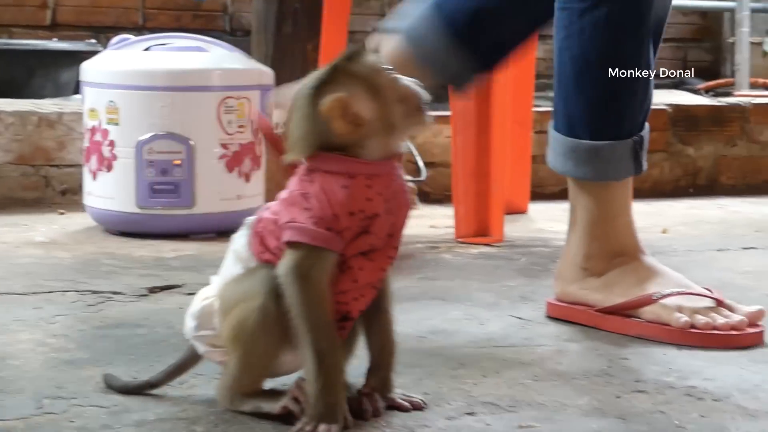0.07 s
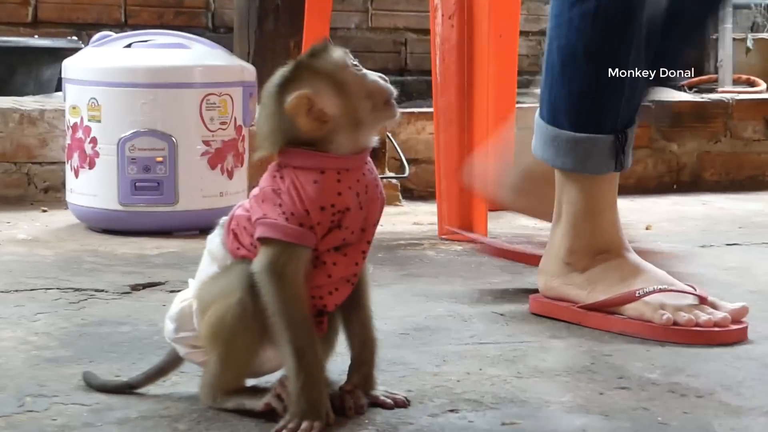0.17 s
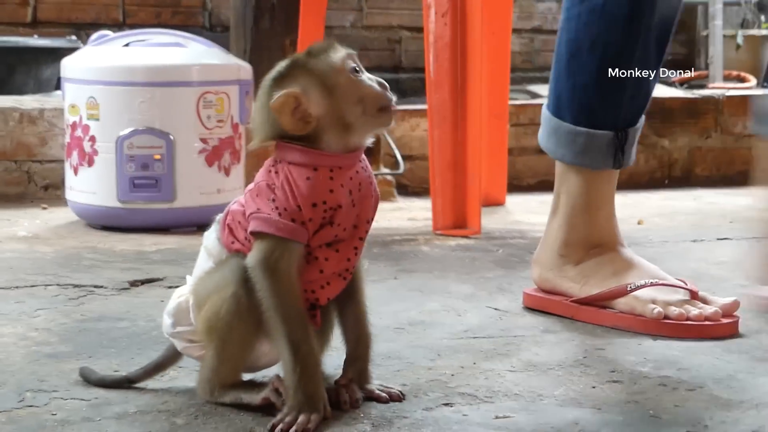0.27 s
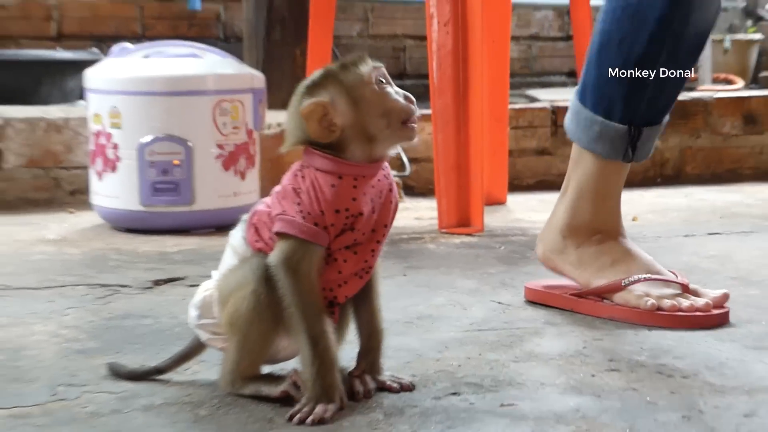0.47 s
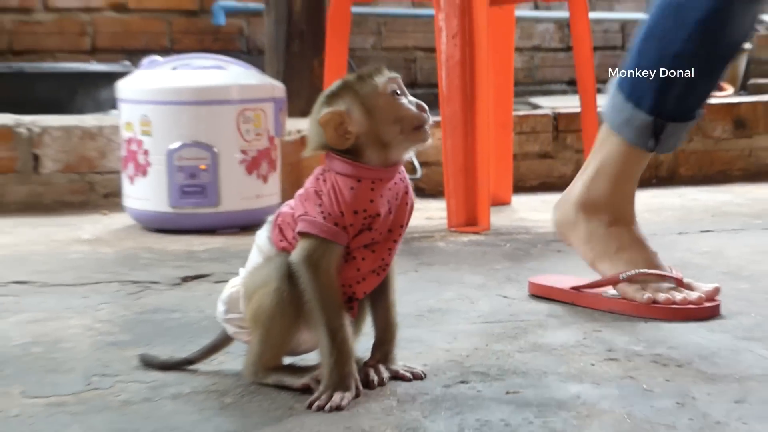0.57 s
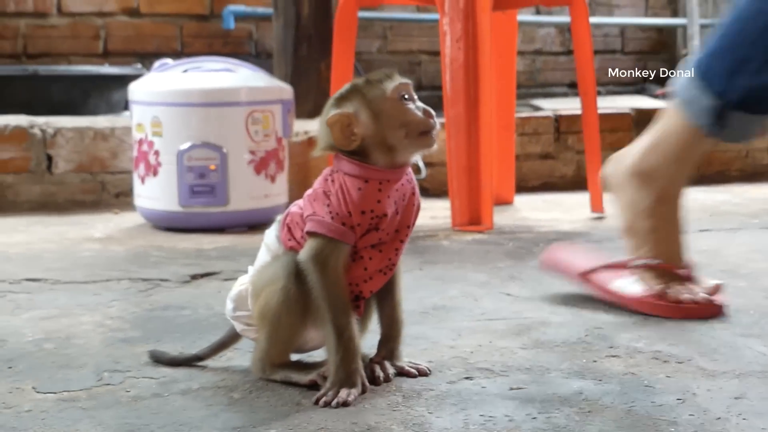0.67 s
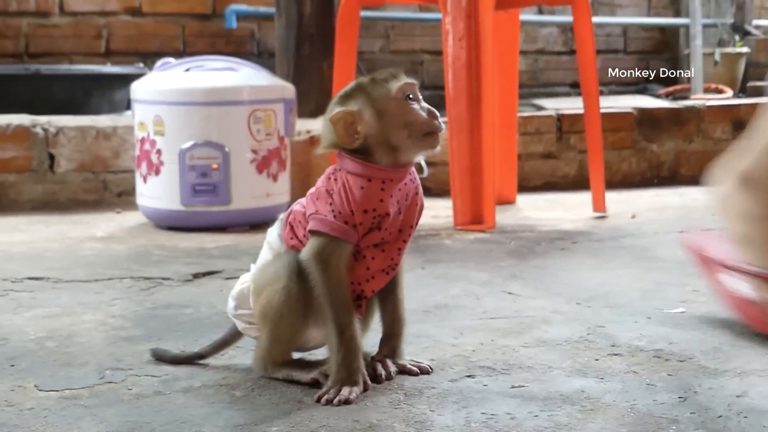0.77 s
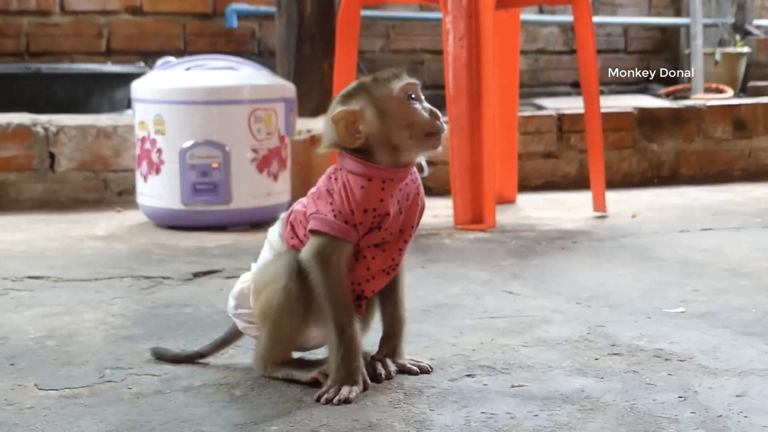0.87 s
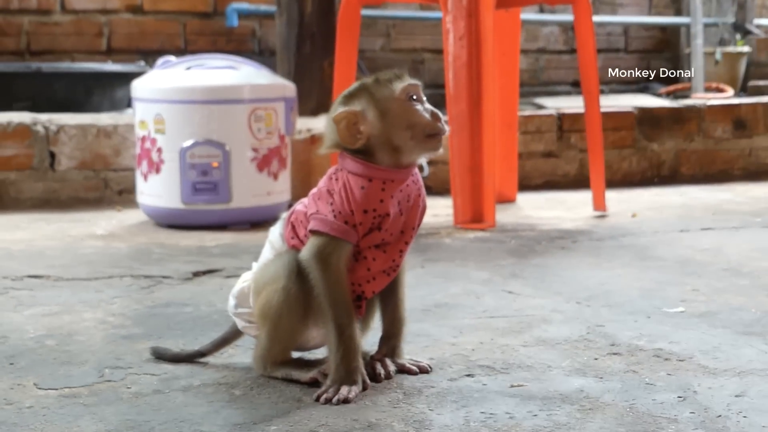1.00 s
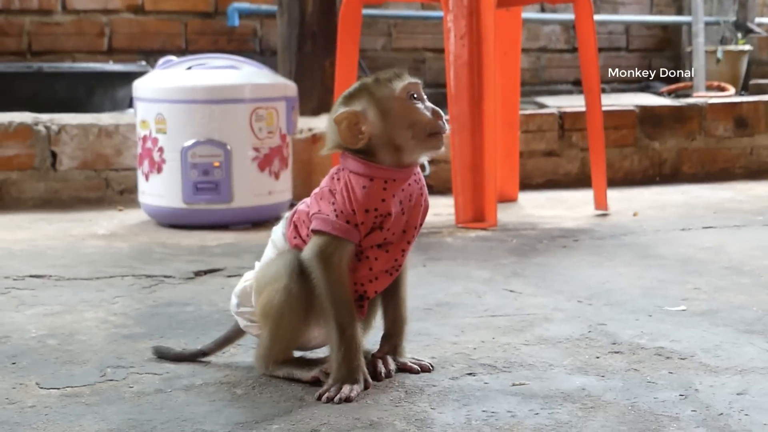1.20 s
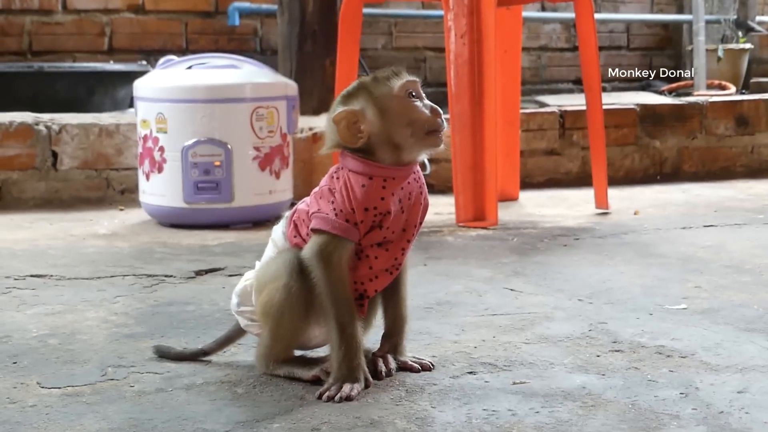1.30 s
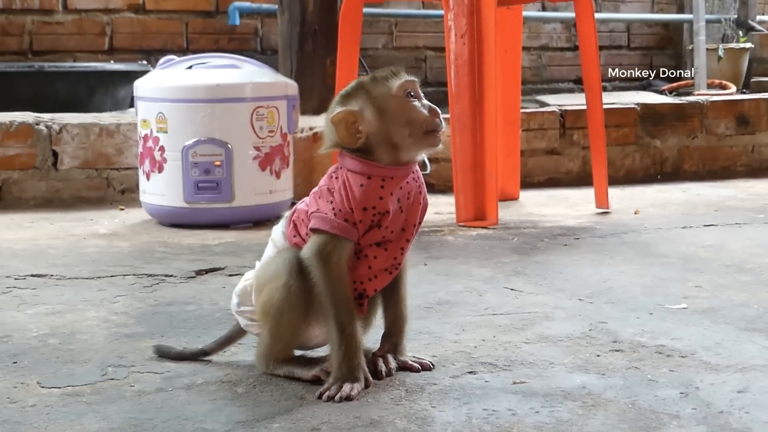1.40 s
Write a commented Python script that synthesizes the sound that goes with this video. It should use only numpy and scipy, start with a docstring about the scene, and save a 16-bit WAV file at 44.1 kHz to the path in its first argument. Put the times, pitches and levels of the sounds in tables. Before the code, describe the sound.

A flip-flop scuffs, squeaks and slaps against a heel on a gritty concrete floor.

```python
"""A faint rustle, then a flip-flop scuffs and squeaks close by on a gritty concrete floor.
The rubber sole hisses as it drags and squeaks as it sticks and slips. Then it peels off the floor
and slaps against the heel, the main sound. Hollow knocks of the sole and small ticks of grit lie
around these. The hard-walled room echoes briefly, over a low, quiet noise with a faint hum."""
import sys
import numpy as np
from scipy import signal
from scipy.fft import rfft, irfft, next_fast_len
from scipy.io import wavfile
from scipy.ndimage import map_coordinates

SR = 44100
rng = np.random.default_rng(int(sys.argv[2]) if len(sys.argv) > 2 else 0)


def persist_wave(psi):
    """Save psi, clipped to +-1, as 16-bit WAV."""
    counts = np.round(np.clip(psi, -1, 1) * 32767).astype(np.int16)
    wavfile.write(sys.argv[1], SR, np.atleast_2d(counts).T)


N = 63945


def amp(db):
    """Turn decibels into a gain."""
    return 10 ** (np.asarray(db) / 20)


def unit(x):
    """Scale x to an average (rms) level of 1."""
    return x / np.sqrt(np.mean(x ** 2) + 1e-20)


def clock():
    """The time of every sample, in seconds."""
    return np.arange(N) / SR


def along(points, hz):
    """Read a (freq_hz, value) table at hz, on a log frequency scale."""
    freqs, values = np.transpose(points)
    return np.interp(np.log(hz + 1), np.log(freqs + 1), values)


def wobble(rate):
    """A smooth curve through rate random points a second."""
    return map_coordinates(rng.standard_normal(N // 8), [clock() * rate], mode="wrap")


def filtered(x, response):
    """Scale each frequency in x by response(hz)."""
    size = next_fast_len(N + SR // 2)
    return irfft(rfft(x, size) * response(np.fft.rfftfreq(size, 1 / SR)), size)[..., :N]


def pan(db):
    """Left and right gains; negative db leans right."""
    return amp(np.array([[1], [-1]]) * db / 2)


def stereo(pair, alike):
    """Mix two unrelated signals to a left-right likeness (0 unrelated, 1 the same)."""
    turn = lambda hz: np.arccos(np.clip(along(alike, hz), -1, 1)) / 2
    mid, side = filtered(pair, lambda hz: np.array([np.cos(turn(hz)), np.sin(turn(hz))]))
    return np.array([mid + side, mid - side])


# How alike left and right are for nearby sounds: freq_hz, likeness
CLOSE_LIKENESS = [(200, 0.81), (6000, 0.91), (9000, 0.8), (14000, 0.25)]
def noise(colour, alike=CLOSE_LIKENESS, grain=1):
    """Stereo noise at level 1; its colour says which frequencies are strong or weak."""
    hiss = stereo(grain * rng.standard_normal((2, N)), alike)
    return unit(filtered(hiss, lambda hz: amp(along(colour, hz))))


CONTACT_RISE_S = 0.00031
def strike(start_s, db, fade_s, rise_s=CONTACT_RISE_S):
    """The loudness of one hit: a quick rise and a fall of 60 dB in fade_s."""
    age = np.maximum(clock() - start_s, 0)
    fall = amp(db - 60 * age / fade_s)
    return fall * (1 - np.exp(-age / rise_s))


def swell(middle_s, half_s, db):
    """Loudness that rises and falls in a bell shape."""
    return amp(db) * np.exp(-.5 * ((clock() - middle_s) / half_s) ** 2)


def contacts(rows, colour):
    """Hits that do not ring: one noise burst per row of start_s, level_db, fade_s."""
    return np.sqrt(sum(strike(*row) ** 2 for row in rows)) * noise(colour)


def ring(start_s, db, hz, fade_s, rise_s=CONTACT_RISE_S):
    """One slightly unsteady tone that dies away."""
    loudness = np.sqrt(2) * strike(start_s, db, fade_s, rise_s)
    return loudness * np.sin(2 * np.pi * hz * (clock() - start_s) + .5 * wobble(250))


def rub(stroke, colour, grains_per_s=4000, spread_db=2.5, grain_share=0.42):
    """One surface drags over another: dense grains on a fine hiss."""
    catches = rng.random(N) < grains_per_s / SR
    grains = catches * amp(spread_db * np.minimum(rng.exponential(size=N), 3))
    texture = np.sqrt(1 - grain_share + grain_share * unit(grains) ** 2)
    level_db = np.interp(clock(), *np.transpose(stroke), left=-120, right=-120)
    return amp(level_db) * noise(colour, grain=texture)


# Colour of the room's low noise: freq_hz, gain_db
AIR_COLOUR = [(15, -61), (25, -60), (81, -2.5), (207, -1), (515, -5.5), (691, -5.5), (1150, -8),
              (1540, -10.5), (1860, -13.5), (3930, -21), (9520, -27.5), (15000, -32)]
# How alike it is left and right: freq_hz, likeness
AIR_LIKENESS = [(50, 0), (200, 0.41), (700, 0.41), (5000, 0.73), (12000, 0.5)]
# Tones of the hum: pitch_hz, level_db
HUM_TONES = [(199, -60), (501, -61), (700, -57)]
# Colour of a dull bump: freq_hz, gain_db
FAR_BUMP_COLOUR = [(30, -34), (90, -4), (145, -6), (200, -8), (600, -57)]
def background():
    """Low room noise, a faint wavering hum and one distant bump."""
    air = amp(-44.5) * noise(AIR_COLOUR, AIR_LIKENESS)
    hum = sum(amp(db) * np.sqrt(2) * np.sin(2 * np.pi * hz * clock() + 0.63 * wobble(8.1))
              for hz, db in HUM_TONES)
    bump = swell(middle_s=1.352, half_s=0.022, db=-41.5) * noise(FAR_BUMP_COLOUR, AIR_LIKENESS)
    return (air + hum + bump) * pan(-0.5)


# How alike the echo is left and right: freq_hz, likeness
ECHO_LIKENESS = [(150, 0.63), (700, 0.83), (2500, 0.58), (5500, 1), (12000, 0.61)]
# Time the echo takes to fall 60 dB: freq_hz, fade_s
ECHO_FADE = [(150, 0.19), (600, 0.68), (2500, 0.46), (6000, 0.53), (14000, 0.49)]
# Colour of the echo: freq_hz, gain_db
ECHO_COLOUR = [(100, -28), (200, 10), (400, 0), (15000, 1.5)]
def in_room(x, echo_db, pan_db, build_s=0.0068):
    """The sound arrives from one side, and the hard walls add a blurred echo."""
    hiss = stereo(rng.standard_normal((2, N)), ECHO_LIKENESS)
    hz, t, bands = signal.stft(hiss, SR, nperseg=256)
    fall = amp(-60 * t / along(ECHO_FADE, hz)[:, None])
    colour = amp(along(ECHO_COLOUR, hz))[:, None]
    rise = 1 - np.exp(-t / build_s)
    tail = signal.istft(bands * fall * colour * rise, SR, nperseg=256)[1]
    echo = signal.fftconvolve(x.mean(0)[None], tail / np.linalg.norm(tail[0]), axes=1)[:, :N]
    return x * pan(pan_db) + amp(echo_db) * echo


# Loudness of the leg's rustle: time_s, level_db
RUSTLE_LEVELS = [(.012, -63), (.019, -40.5), (.03, -53), (.07, -48.5), (.11, -75)]
# Its colour: freq_hz, gain_db
RUSTLE_COLOUR = [(300, -32), (800, 8.5), (1800, -6), (2900, -0.5), (3700, -18), (15000, -17)]
def rustle():
    """The swinging leg rustles faintly."""
    return rub(RUSTLE_LEVELS, RUSTLE_COLOUR)


# Loudness of the shifting sole: time_s, level_db
SHIFT_LEVELS = [(.98, -42), (1.025, -40), (1.06, -41.5), (1.1, -65)]
# Its colour: freq_hz, gain_db
SHIFT_COLOUR = [(120, -20), (350, -2), (600, 7.5), (1100, -2.5), (1600, -2), (6000, -32)]
def settle():
    """The sole shifts with a soft rub as it settles."""
    return rub(SHIFT_LEVELS, SHIFT_COLOUR)


# Small clicks of grit: start_s, level_db
GRIT_TICKS = [(0.083, -33.5), (0.2099, -30), (0.247, -24), (0.446, -43), (0.74, -34)]
# Their colour: freq_hz, gain_db
GRIT_COLOUR = [(200, -25), (1500, 3), (2200, -12), (3100, -7), (3800, 10), (5000, -8), (12000, -1),
               (15000, -7)]
def ticks(fade_s=0.015):
    """Bits of grit catch under the sole and click."""
    return contacts([(start_s, db, fade_s) for start_s, db in GRIT_TICKS], GRIT_COLOUR)


# Loudness of the lifting sole: time_s, level_db
LIFT_LEVELS = [(.645, -81), (.675, -44), (.72, -40.5), (.742, -33.5), (.785, -42), (.82, -43)]
# Its colour: freq_hz, gain_db
LIFT_COLOUR = [(80, -32), (400, -18), (900, -2), (1400, -12), (2400, -1), (3300, -6.5), (4000, -2.5),
               (4800, -8.5), (7500, -11), (10800, -11.5), (15000, -22)]
def peel():
    """The sole rubs the floor as it peels away."""
    return rub(LIFT_LEVELS, LIFT_COLOUR)


# Loudness of the dragging sole: time_s, level_db
DRAG_LEVELS = [(.207, -78), (.212, -37), (.24, -34.5), (.252, -30.5), (.32, -30.5), (.36, -28), (.42, -35),
               (.447, -29.5), (.47, -44.5), (.52, -50)]
# Its colour: freq_hz, gain_db
DRAG_COLOUR = [(80, -27), (300, -23.5), (850, -7.5), (1500, -9.5), (2100, 0.5), (2800, -2.5), (3500, -5),
               (6000, -5), (7600, -8.5), (10500, -4), (15000, -14.5)]
def scuff():
    """The rubber sole drags over gritty concrete."""
    return rub(DRAG_LEVELS, DRAG_COLOUR)


# Bursts of squeaking: middle_s, half_length_s, pitch_hz, level_db
SQUEAK_BURSTS = [(0.2129, .002, 1430, -38.5), (.217, 0.0016, 1188, -37), (0.221, 0.002, 1173, -26.5),
                 (0.227, 0.0015, 1183, -32.5), (0.251, 0.004, 1150, -28), (0.278, 0.0083, 1207, -29),
                 (0.282, .0034, 1136, -20.5), (.297, 0.0039, 1212, -23), (0.312, 0.0032, 1210, -20),
                 (0.321, 0.0041, 1128, -18.5), (0.331, 0.0041, 1133, -23.5), (0.3402, 0.0028, 1131, -19.5),
                 (0.354, .016, 1127, -32), (0.8421, 0.0023, 1160, -21), (0.859, 0.0046, 1172, -27.5)]
# Tones within the squeak: pitch_multiple, gain_db
SQUEAK_TONES = [(1, -18), (2, -0.6), (3, -14)]
def squeaks(waver_share=0.0214, rough_db=2, blur_radians=0.099):
    """Rubber sticks and slips: one rough, wavering tone that swells in bursts."""
    times, _, pitches, _ = np.transpose(SQUEAK_BURSTS)
    hz = np.interp(clock(), times, pitches) * (1 + waver_share * wobble(700))
    phase = 2 * np.pi * np.cumsum(hz) / SR
    tone = 0
    for multiple, db in SQUEAK_TONES:
        gain = amp(db + rough_db * wobble(600))
        blur = blur_radians * (multiple - 1) * wobble(600)  # higher tones blur more
        tone += gain * np.sin(multiple * phase + blur)
    bursts = np.sqrt(sum(swell(middle_s, half_s, db) ** 2 for middle_s, half_s, _, db in SQUEAK_BURSTS))
    return np.sqrt(2) * bursts * tone * np.ones((2, 1))


# Low tones of the landing heel: pitch_hz, gain_db
HEEL_TONES = [(195, -1.5), (330, -4)]
def thud(start_s=.8335, db=-22):
    """The heel's weight lands with a low push that dies quickly."""
    push = sum(ring(start_s, db + gain_db, hz, fade_s=0.074, rise_s=0.0052) for hz, gain_db in HEEL_TONES)
    return signal.sosfilt(signal.butter(2, 130, "high", fs=SR, output="sos"), push)


# Knocks of the sole on the floor: start_s, pitch_hz, level_db
SOLE_KNOCKS = [(.442, 588, -36.5), (.834, 559.6, -20.5), (.8475, 660, -15), (.912, 599, -20.5),
               (1.0045, 620, -26)]
# Ringing of the sole and the air under it: pitch_multiple, gain_db, fade_s
SOLE_TONES = [(.53, -10, 0.048), (1.001, -2, 0.039), (1.33, -9.5, 0.019), (2.04, -16.5, 0.085)]
def knocks():
    """Hollow pats of foam rubber; air trapped under the sole gives each its own pitch."""
    pats = sum(ring(start_s, db + gain_db, hz * multiple, fade_s)
               for start_s, hz, db in SOLE_KNOCKS for multiple, gain_db, fade_s in SOLE_TONES)
    bass_cut = signal.butter(4, 220, "high", fs=SR, output="sos")  # a small sole gives little bass
    return signal.sosfilt(bass_cut, pats) * np.ones((2, 1))


# Quick hits of sole on heel: start_s, crack_db, puff_db, fade_s
HEEL_HITS = [(0.8236, -25.5, -36.5, 0.31), (0.832, -25, -31, .045), (.838, -20.5, -27, .055),
             (0.8445, -17.5, -24, 0.061), (0.8472, -21.5, -19, 0.032), (.864, -23, -37, 0.13),
             (0.891, -23, -32.5, 0.14)]
# Colour of the sharp crack: freq_hz, gain_db
HIT_COLOUR = [(100, -51.5), (200, -41), (700, -6), (1050, -7.5), (1300, -3.5), (1560, -11), (2260, 0),
              (2820, -2), (3550, -7), (4200, -11.5), (6500, -18.5), (10400, -23.5), (15000, -33)]
# Colour of the puff of air: freq_hz, gain_db
PUFF_COLOUR = [(40, -45), (100, -49), (170, -10.5), (330, -6.5), (420, -10), (620, -17), (900, -3),
               (1300, -11), (2000, -4), (8000, -78)]
def slap(puff_gain_db=-1.5):
    """Each hit of sole on heel cracks and squeezes out a puff of air; grit crunches after it."""
    crack = contacts([(s, db, fade_s) for s, db, _, fade_s in HEEL_HITS], HIT_COLOUR)
    puff = contacts([(s, db + puff_gain_db, fade_s) for s, _, db, fade_s in HEEL_HITS], PUFF_COLOUR)
    crunch = strike(start_s=.831, db=-29.5, fade_s=0.47) * noise(DRAG_COLOUR)
    return crack + puff + crunch


def scene():
    """The flip-flop sounds in the room, a little to the right, over the background."""
    rubbing = rustle() + scuff() + peel() + settle()
    return (in_room(rubbing, echo_db=-4, pan_db=-1.1)
            + in_room(ticks(), echo_db=-28, pan_db=-1.1)
            + in_room(squeaks(), echo_db=-11, pan_db=-2.5)
            + in_room(slap(), echo_db=-0.5, pan_db=-2.5)
            + in_room(knocks() + thud(), echo_db=-7.5, pan_db=-2.5)
            + background())


# Balance of the two microphones: freq_hz, left_minus_right_db
MIC_BALANCE = [(200, -0.8), (3000, 0.1), (6000, 0.8), (11000, -1.5)]
def record(dry, top_hz=15250):
    """The two microphones differ slightly in colour; nothing above top_hz is kept."""
    return filtered(dry, lambda hz: pan(along(MIC_BALANCE, hz)) * (hz < top_hz))


dry = scene()
out = record(dry)
persist_wave(out)
```